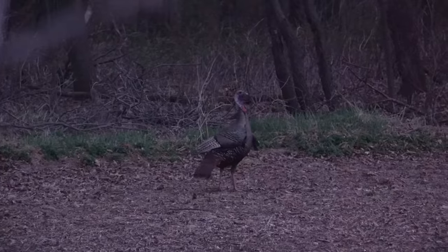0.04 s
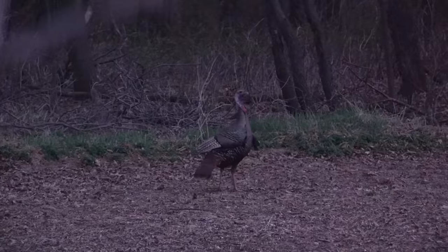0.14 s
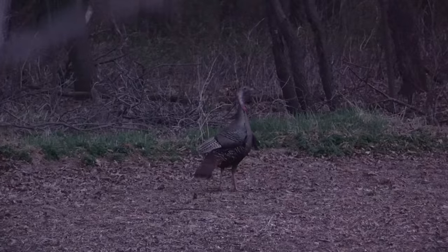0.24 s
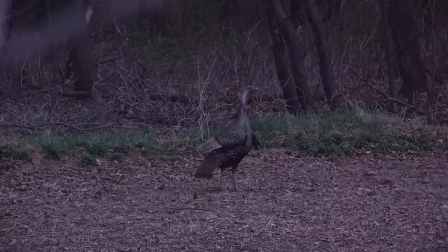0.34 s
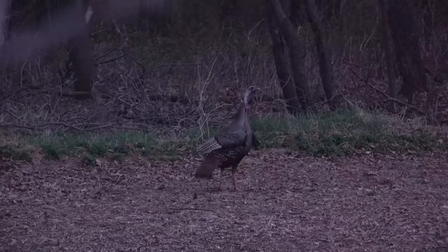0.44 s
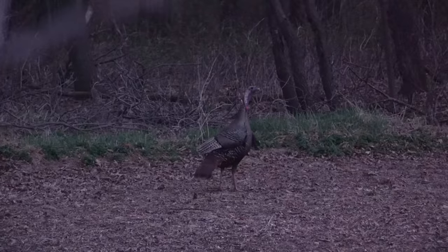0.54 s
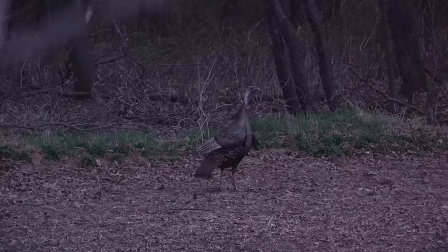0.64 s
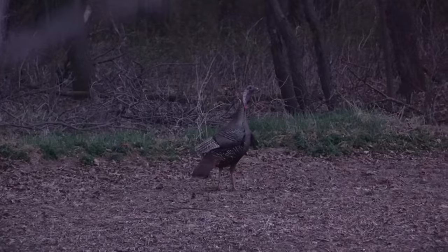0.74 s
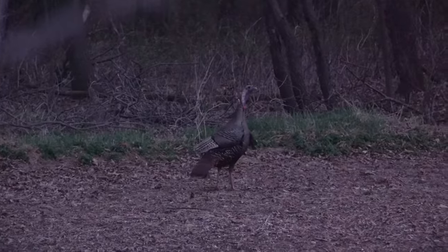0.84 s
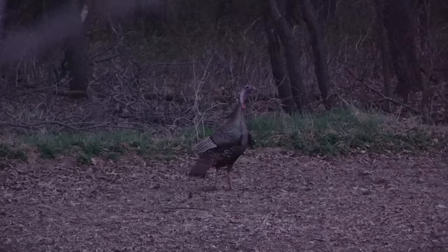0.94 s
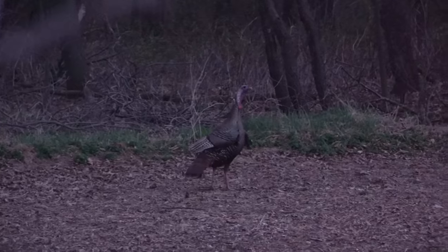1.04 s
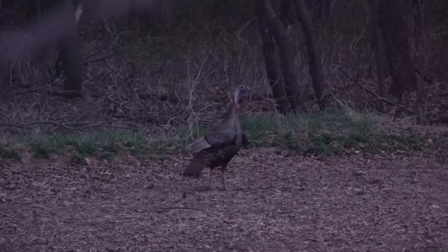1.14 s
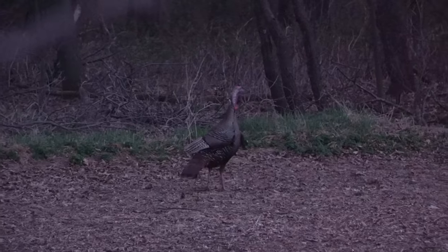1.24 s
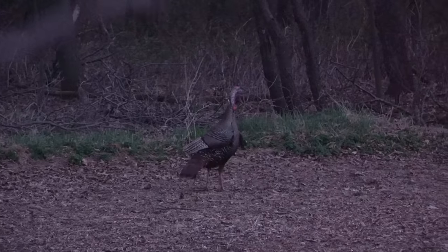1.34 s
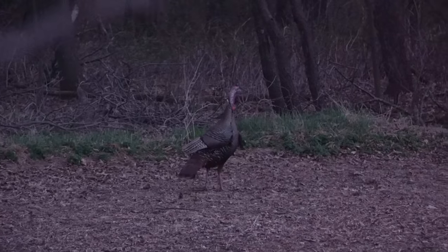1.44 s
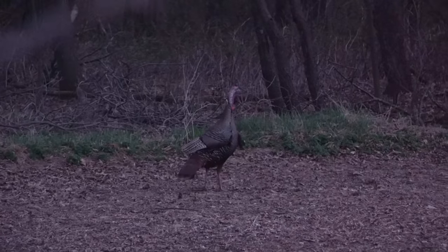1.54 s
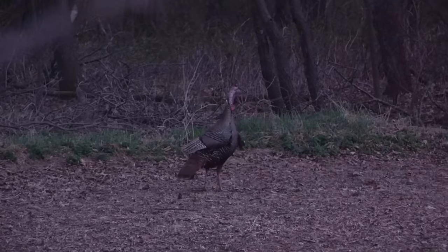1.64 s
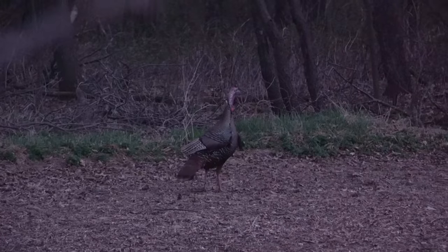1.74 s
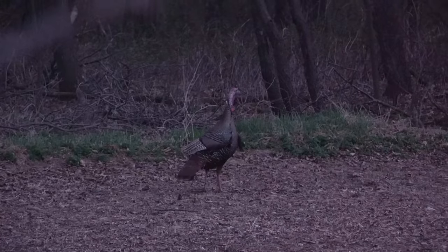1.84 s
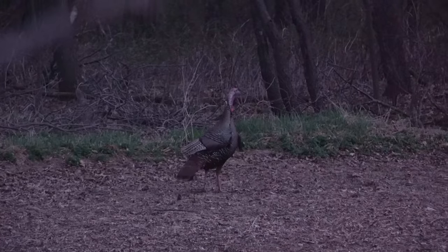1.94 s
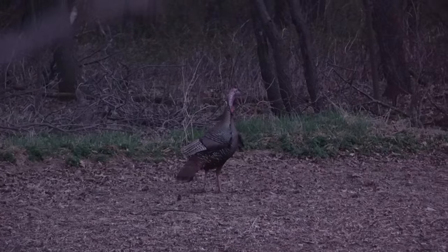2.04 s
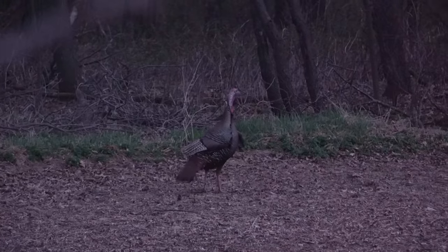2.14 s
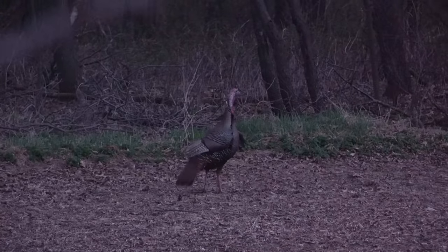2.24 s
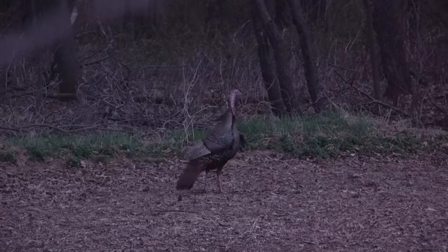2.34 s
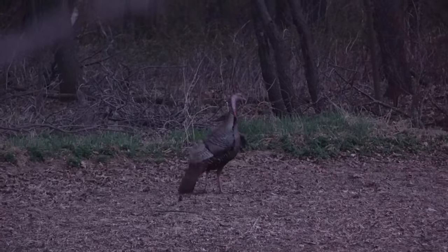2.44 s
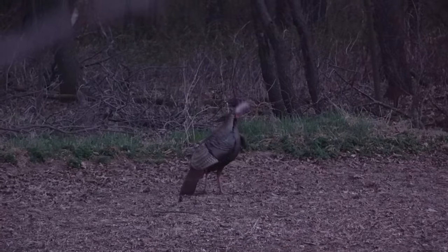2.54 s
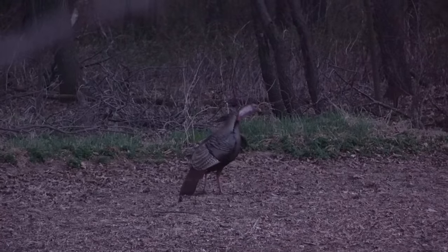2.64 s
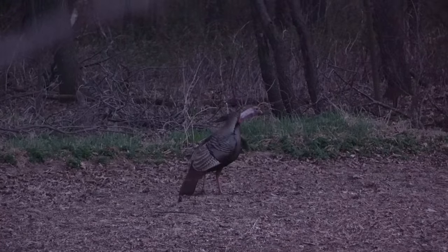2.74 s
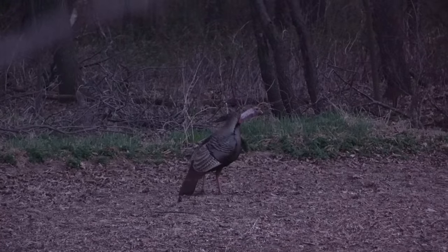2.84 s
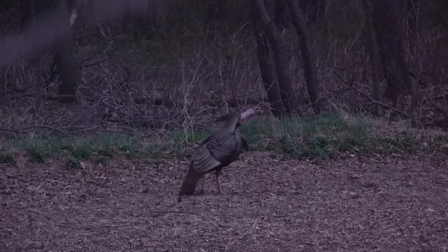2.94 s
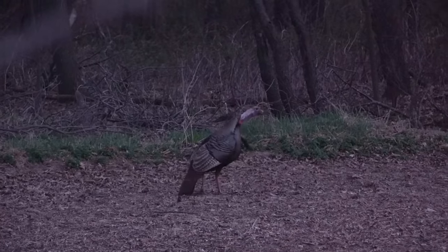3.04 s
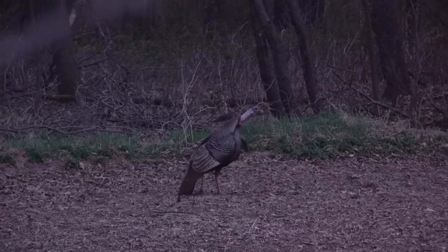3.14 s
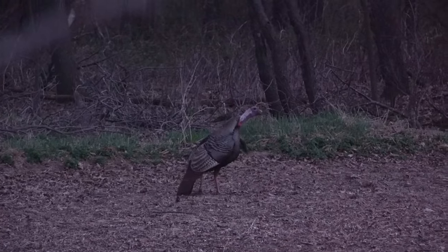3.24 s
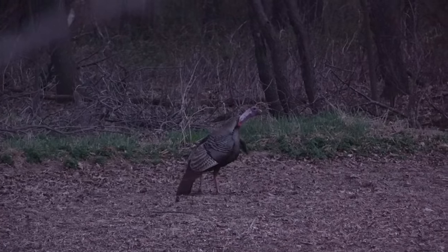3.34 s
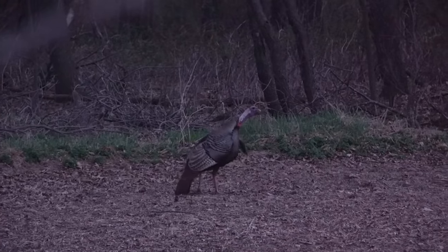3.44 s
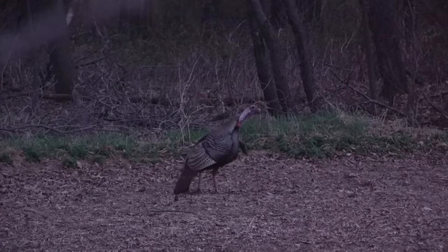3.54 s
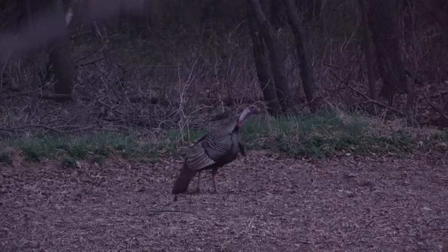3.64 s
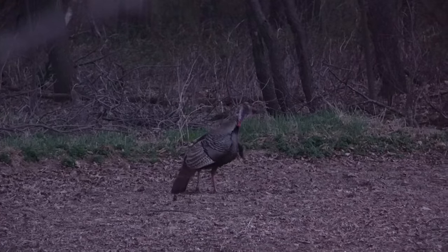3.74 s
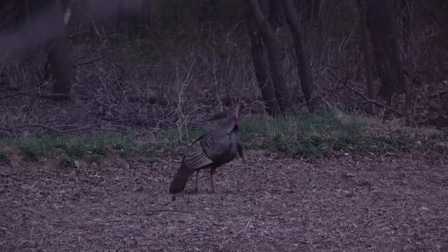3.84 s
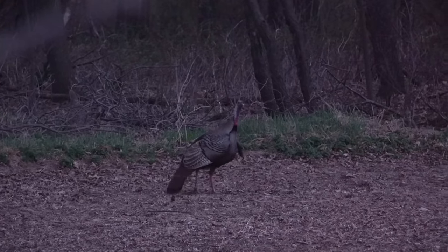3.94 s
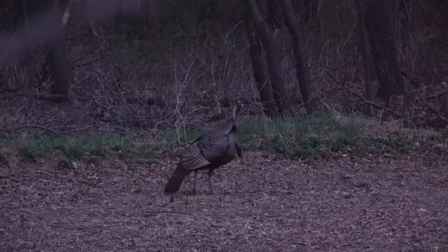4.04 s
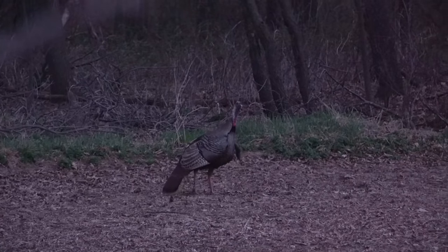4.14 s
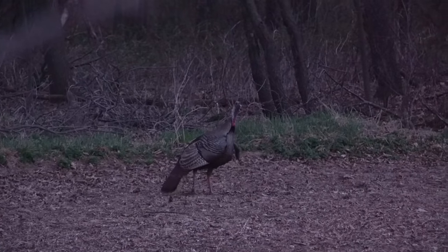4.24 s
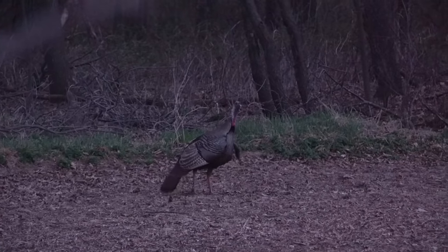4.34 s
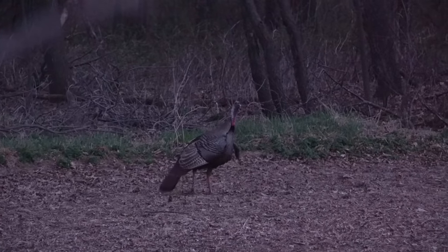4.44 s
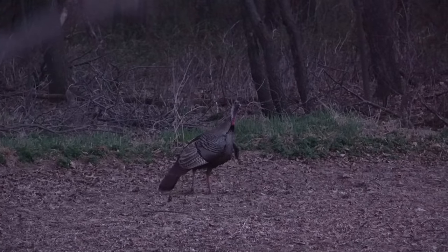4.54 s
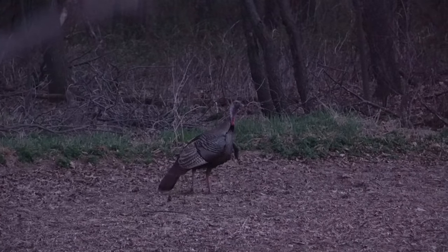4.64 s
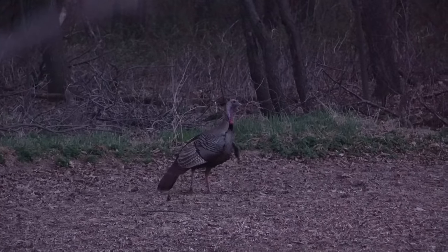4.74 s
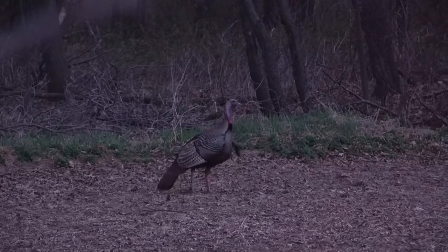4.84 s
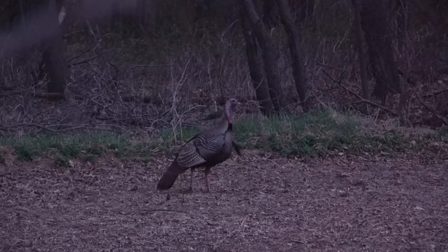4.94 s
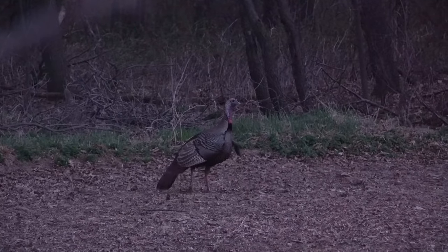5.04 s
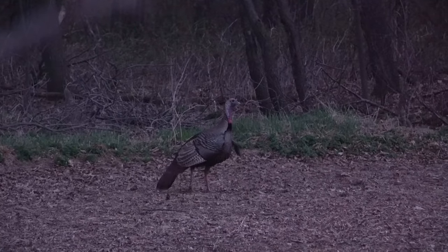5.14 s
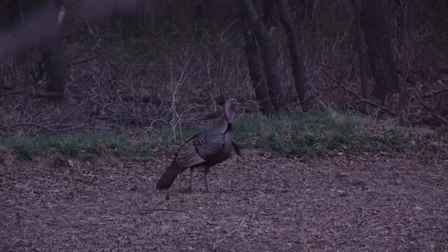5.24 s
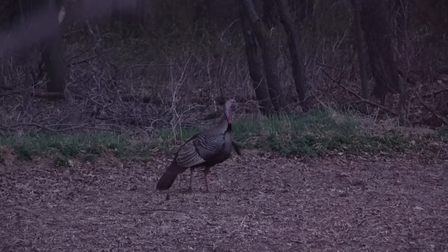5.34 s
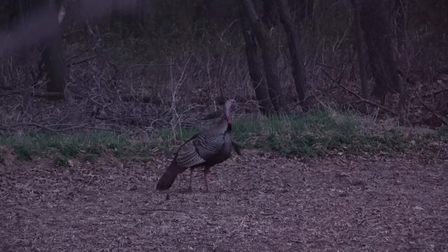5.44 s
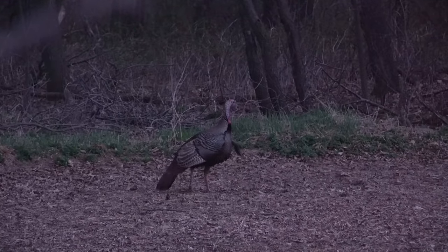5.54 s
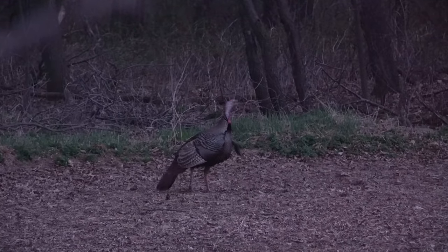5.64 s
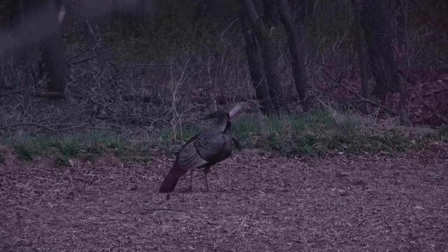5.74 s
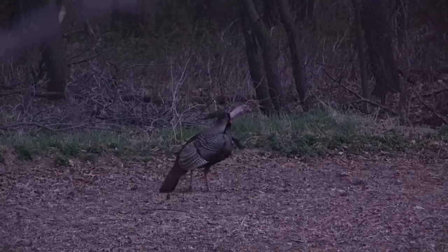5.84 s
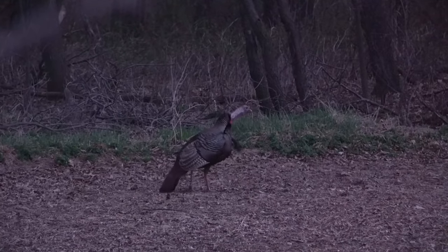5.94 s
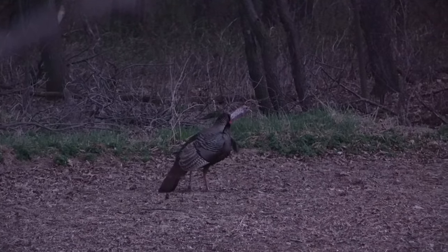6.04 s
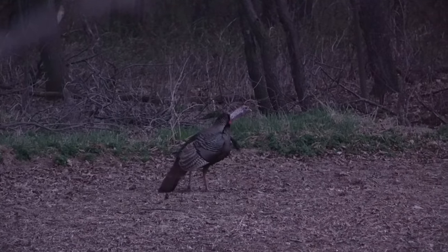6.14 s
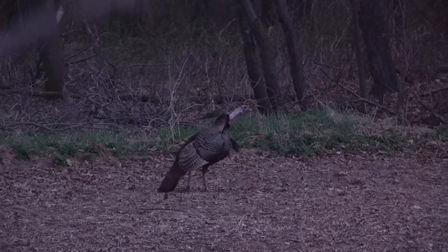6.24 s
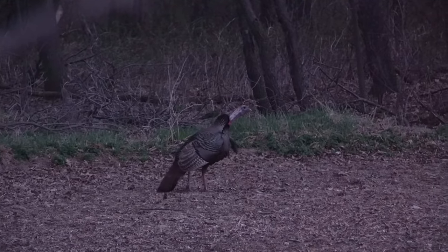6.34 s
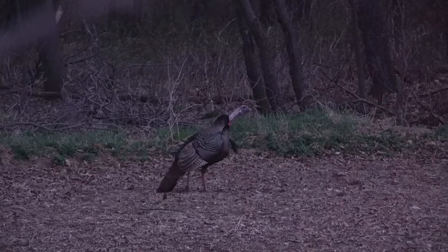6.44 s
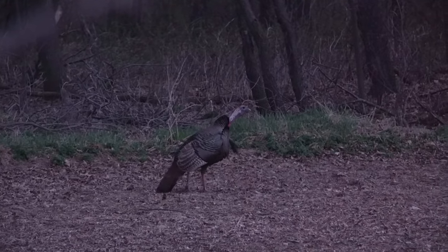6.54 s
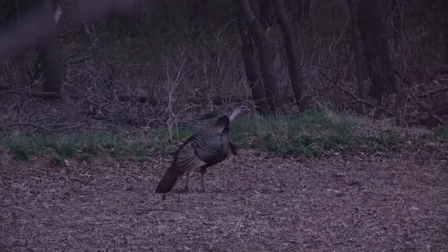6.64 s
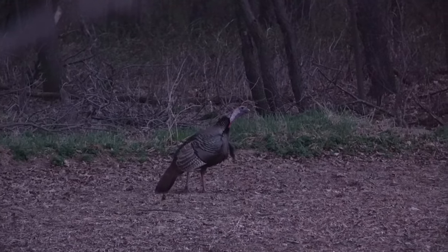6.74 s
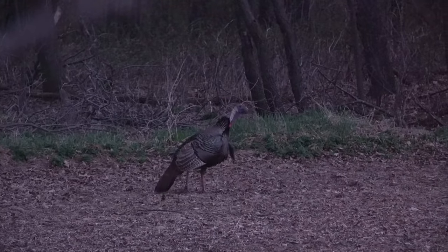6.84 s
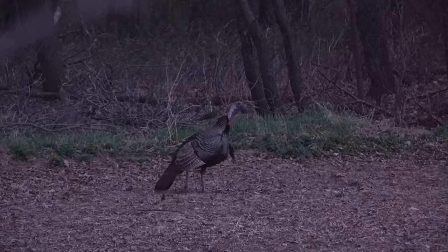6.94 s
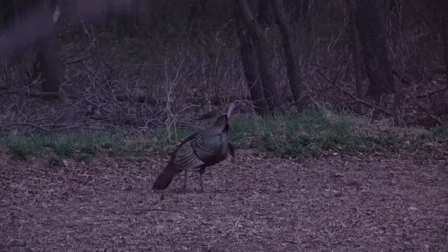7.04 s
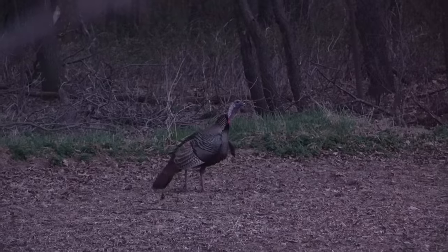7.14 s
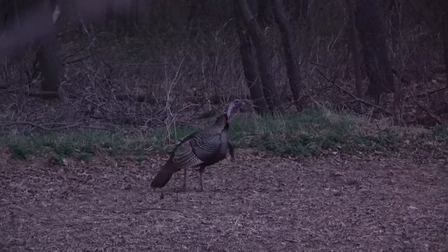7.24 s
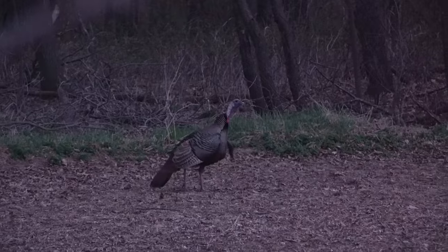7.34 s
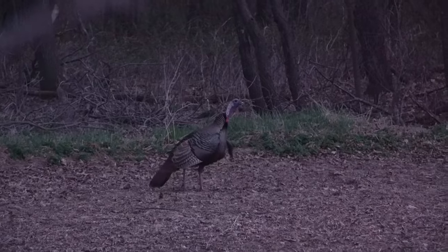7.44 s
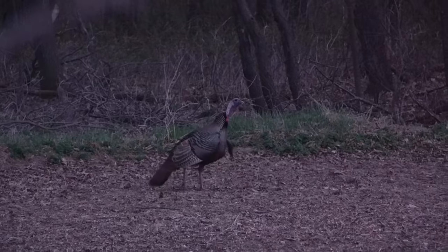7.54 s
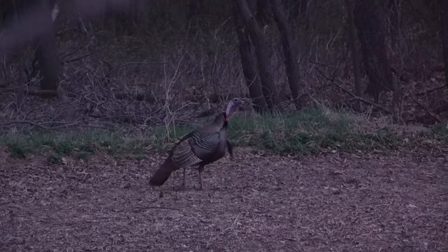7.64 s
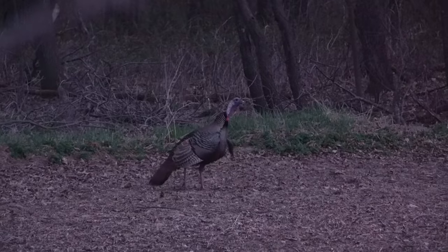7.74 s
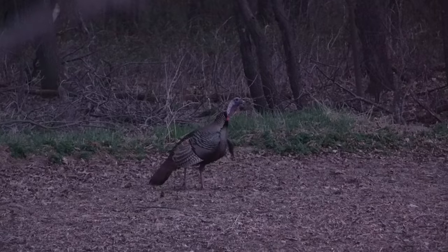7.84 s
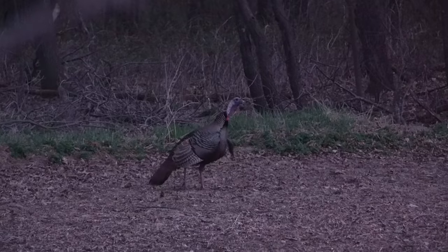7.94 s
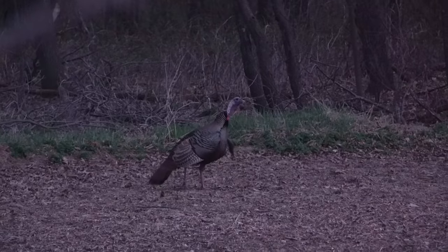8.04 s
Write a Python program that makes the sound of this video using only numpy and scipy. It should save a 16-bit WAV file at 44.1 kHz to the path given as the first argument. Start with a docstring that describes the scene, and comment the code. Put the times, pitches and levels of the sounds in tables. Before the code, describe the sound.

A deep, wavering, wind-like rumble fills an outdoor wood edge from 0 to 8 seconds, with quiet steady hiss and a light breeze that comes and goes. From 0.3 seconds faint songbirds give tiny slurs and whistles around 2 to 3 kilohertz; a distant crow caws hoarsely from 0.8 to 2.2 seconds, with a faint stuttering run of yaps near 1.7 to 2.2. At 2.5 seconds the turkey gobbles: a brief squeaky onset, then rapid hoarse yelps falling from about 580 to 300 hertz, slowing and fading by 4. Trees answer with a diffuse echo. Caws return from 4.1 to 5.4, among chirps and dim hoots. A second, tighter gobble runs from 5.7 to 7, with a thin squeak near 6.9. Rumble, a small breeze swell around 7.3, sparse chirps and faint low hoots finish it. Wide stereo, turkey leaning slightly left.

```python
"""Turkey gobbling at a wood's edge

A wild turkey gobbles twice: rattles of short hoarse yelps that sink in pitch, each a pulsing membrane
ringing mouth, chest and throat resonances. The wood answers with decaying scattered noise. Songbirds
(gliding sines), far hoots and yaps (arched sines) and a crow (hoarse pulses) call farther off,
over a wavering low rumble, steady hiss and a breeze in the trees (coloured noise)."""
import sys
import numpy as np
from scipy import signal
from scipy.fft import rfft, irfft, next_fast_len
from scipy.io import wavfile

SR = 44100
rng = np.random.default_rng(int(sys.argv[2]) if len(sys.argv) > 2 else 0)


def materialize(psi):
    """Save the field psi as 16-bit PCM at rate SR to the path in sys.argv[1].

    A 1-D psi becomes a single channel; in a 2-D psi each row is a channel.
    """
    bounded = np.clip(np.atleast_2d(psi).T, -1, 1)
    quanta = np.round(bounded * 32767).astype(np.int16)
    wavfile.write(sys.argv[1], SR, quanta)


N = 356769
TIME = np.arange(N) / SR

# All table levels are relative, before group gains; call lengths are before each group's stretch.

# Two gobbles: start_s, length_s
GOBBLES = [(2.52, 1.47), (5.7, 1.3)]
# Yelps, full voice near 570 Hz or dropped to about 310 Hz:
# near_middle_s, length_s, pitch_hz, level_db, strain_db (rasp relative to the level)
YELPS = [(2.53, 0.055, 582.6, -24, -10.5), (2.58, 0.022, 434, -23, -19), (2.606, 0.033, 589, -24, -4.5),
         (2.678, .034, 530, -18, -10), (2.737, 0.029, 576.5, -21, -9.5), (2.763, .018, 354, -33, 4.5),
         (2.789, 0.03, 569, -23, -7.5), (2.835, 0.027, 302.4, -22.5, -6.5), (2.856, 0.036, 596, -23, -5.5),
         (2.879, .028, 549, -20, -12), (2.906, 0.037, 600, -20, -13.5), (2.933, .031, 551, -22.5, -9.5),
         (2.984, .037, 583, -24.5, -6), (3.044, 0.038, 574.4, -20.5, -8),
         (3.117, 0.048, 339.6, -19.5, -11.5), (3.177, .046, 561, -20.5, -8),
         (3.241, 0.048, 336.7, -22.5, -7), (3.311, 0.04, 327, -19.5, -9), (3.386, 0.032, 327, -24.5, -6),
         (3.466, .039, 321.8, -23, -7.5), (3.536, .037, 309.6, -23.5, -10), (3.62, .025, 303.2, -24, -16),
         (3.677, 0.037, 294.6, -29.5, -17), (3.731, 0.044, 298, -25.5, -11.5),
         (3.805, 0.044, 299.4, -26, -13.5), (3.876, 0.029, 292, -38, -9.5), (3.987, 0.031, 297.6, -34, -20),
         (5.7, .04, 602.6, -19, -14.5), (5.778, .04, 644.4, -20, -13), (5.818, 0.039, 598, -36, -6),
         (5.853, 0.04, 640, -24.5, -9), (5.916, 0.028, 521.4, -19.5, -10.5),
         (5.964, 0.04, 621.5, -21.5, -9), (5.996, 0.022, 533, -21, -19), (6.017, 0.022, 404.6, -20, -8.5),
         (6.048, .038, 597, -18, -9.5), (6.096, .026, 591.6, -21, -12), (6.12, .035, 591, -17, -15),
         (6.189, .043, 333.2, -23.5, -9), (6.247, 0.058, 559.3, -20.5, -9.5),
         (6.326, 0.056, 331, -24, -8.5), (6.378, 0.043, 552, -21, -9.5), (6.419, 0.024, 319.3, -29.5, -8),
         (6.453, .024, 317, -30.5, -2), (6.495, 0.035, 319.7, -28.5, -11.5),
         (6.541, 0.064, 548, -24.5, -11), (6.584, .025, 311, -29, -1.5), (6.608, .031, 304.7, -21, -14),
         (6.65, .025, 308, -28, -10.5), (6.685, .026, 302.3, -28.5, -25), (6.761, 0.03, 309.2, -29, -3.5),
         (6.834, 0.03, 289.8, -25.5, -14), (6.922, 0.039, 283, -35.5, -15), (6.995, .04, 276, -35.5, -19)]
# Course of every gobble, as the neck stretches and the air runs out:
# share_of_length, mouth_hz, windpipe_tuning_ratio, pitch_arch_share, chest_db, throat_db, roughness_0_to_1
COURSE = [(0, 1200, 1.0, .33, -13, -15, 0.54), (0.121, 1100, 1.06, 0.2143, -11, -5.5, 0.48),
          (.27, 1140, 1.03, 0.1683, -4.5, 1, .45), (0.379, 988.5, 1.023, 0.1565, -7, -4, 0.6),
          (0.622, 930, .99, .12, -5, -3, .5), (.76, 870, 0.976, 0.0804, -8.5, -8.5, .35),
          (1, 855, 0.917, 0.061, -2, -10.5, 0.53)]
# Turkey resonances before tuning: centre_hz, width_hz (one pass), level_db
CHEST_MODES = [(559, 79, 0), (839, 43, -3.5)]
THROAT_MODES = [(1654, 133, 0)]
RASP_MODES = [(2206, 290, 8.5), (3065, 260, 5), (3310, 390, 9), (3726, 265, 3.5), (4860, 760, -11)]
# Clean slurs opening each gobble: start_s, length_s, first_hz, middle_hz, last_hz, level_db
OPENING_SLURS = [(2.512, 0.044, 1208, 1712, 1360, -19), (2.574, 0.024, 1035, 1313, 1510, -24.5),
                 (2.605, .055, 1520, 1344, 1310, -32), (5.69, 0.0417, 1410, 1724, 1280, -26.5),
                 (5.76, 0.011, 860, 1086, 1320, -21.5)]

# Wood echo decay: centre_hz, t60_s
ECHO_T60 = [(500, 0.74), (1000, 1.37), (2000, 0.37), (4000, 0.69), (8000, 0.44)]
# Wood echo strength: centre_hz, level_db
ECHO_DB = [(500, 4), (1000, -4.5), (2000, -6.5), (4000, -13.5), (8000, -3)]
# Wood echo left-right agreement: centre_hz, likeness_0_to_1
ECHO_LIKENESS = [(500, 0.05), (1000, 0.67), (2000, 0.92), (4000, 1)]

# Songbird down-slurs, levelling off on one pitch: start_s, length_s, first_hz, level_db
DOWNSLURS = [(0.315, 0.051, 2850, -48.5), (0.888, 0.053, 2650, -41), (1.483, .056, 2760, -57),
             (1.957, 0.03, 3130, -46), (2.141, .046, 2580, -44), (2.31, 0.097, 2670, -54),
             (3.573, 0.076, 2700, -44), (4.725, 0.043, 2450, -40.5), (5.127, 0.061, 3660, -36.5),
             (5.257, 0.029, 2610, -39), (5.358, 0.085, 2930, -40), (7.218, 0.075, 2940, -49),
             (7.527, 0.053, 2800, -59), (7.769, 0.041, 2800, -51), (7.93, 0.041, 2790, -51)]
# Songbird rising notes: start_s, length_s, middle_hz, level_db
UPSLURS = [(0.454, 0.031, 2340, -37), (0.838, 0.067, 3220, -42), (1.047, 0.064, 2430, -47.5),
           (2.097, 0.025, 2305, -41.5), (3.545, 0.0413, 3160, -36.5), (4.67, 0.052, 2560, -41),
           (5.219, 0.04, 3033, -32.5)]
# Songbird falling chips: start_s, length_s, middle_hz, level_db
CHIPS = [(0.402, 0.038, 3020, -43), (2.042, 0.028, 3050, -45), (2.129, 0.046, 2790, -43),
         (4.645, 0.017, 3050, -33)]
# Songbird held whistles: start_s, length_s, middle_hz, level_db
HELD_WHISTLES = [(.484, 0.055, 2725, -46), (0.958, 0.14, 2307, -51.5), (1.422, 0.11, 3154, -36.5),
                 (1.59, .17, 2504, -45.5), (2.458, 0.047, 3153, -40), (4.051, 0.14, 3169, -33),
                 (4.224, 0.073, 2508, -40), (4.3, 0.1, 2620, -49), (4.571, 0.061, 2297, -37.5),
                 (4.701, 0.12, 3075, -47.5), (4.752, 0.062, 2215, -54)]
# Thin squeak, one curve: time_s, pitch_hz, level_db
SQUEAK = [(6.885, 3400, -58), (6.905, 3510, -34), (6.935, 4780, -71), (6.95, 4230, -43), (6.962, 3040, -31)]
# Far hoots: start_s, length_s, middle_hz, level_db
HOOTS = [(4.65, 0.13, 780, -47), (4.85, 0.3, 505.5, -54), (5.34, 0.208, 788, -49.5),
         (7.197, 0.722, 596, -52.5), (7.7, .45, 772, -55)]
# Far stuttering run of yaps: start_s, length_s, middle_hz, level_db
YAPS = [(1.672, 0.014, 1015, -49), (1.708, 0.017, 1110, -46), (1.742, 0.015, 1170, -46),
        (1.776, 0.022, 1155, -52), (1.81, 0.043, 1150, -61), (1.84, .045, 1127, -45.5),
        (1.895, 0.088, 1134, -48), (2.05, .06, 1098, -56), (2.165, 0.11, 1050, -54)]
# Far crow's caws: middle_s, level_db
CAWS = [(0.771, -51), (1.048, -48), (1.328, -46), (1.629, -42), (1.917, -47), (2.22, -44), (4.11, -39.5),
        (4.418, -38.5), (4.73, -35), (5.04, -39), (5.35, -37)]
# Crow throat resonances: centre_hz, width_hz (one pass), level_db
CROW_THROAT = [(1055, 310, -4.5), (1430, 320, -3.5)]

# Rumble spectrum: frequency_hz, density_db (per Hz)
RUMBLE_SPECTRUM = [(10, 4), (25, -2.5), (40, -6.5), (62, -11), (100, -19.5), (160, -29), (250, -42),
                   (500, -53), (1000, -110)]
# Rumble strength: time_s, level_db
RUMBLE_LEVEL = [(0, -4.5), (.8, -7), (1.5, -10), (2.3, -8.5), (3.15, -14), (3.7, -9), (5.0, -8), (6.2, -10),
                (8.0, -8.5)]
# Hiss spectrum: frequency_hz, density_db (per Hz)
AIR_SPECTRUM = [(200, 6.5), (400, -11), (700, -1), (1500, -0.5), (3400, 1), (4000, -7.5), (4800, -11.5),
                (7000, -12), (15000, -16.5)]
# Breeze spectrum: frequency_hz, density_db (per Hz)
BREEZE_SPECTRUM = [(120, -15), (230, -7.5), (310, -2), (450, -6.5), (700, -10.5), (1200, -21), (2500, -28)]
# Breeze strength: time_s, level_db
BREEZE_LEVEL = [(0, -36.5), (.5, -39.5), (1.1, -41), (1.6, -49), (2.3, -43), (3.0, -41), (3.9, -40),
                (4.4, -38), (4.9, -44), (5.5, -45.5), (6.3, -41.5), (7.0, -47.5), (7.35, -32.5),
                (8.09, -39)]
# Background left-right agreement: frequency_hz, likeness_0_to_1
AIR_LIKENESS = [(50, 1.0), (100, .98), (180, 0.98), (320, 0.62), (600, 0.023), (1200, 0.072), (3000, 1),
                (4500, 0.21), (7000, 0.053)]

# Turkey voice
USUAL_STRAIN_DB = -12
# dB per dB of extra strain: easy yelps are purer, strained ones croak
CHEST_PER_STRAIN, THROAT_PER_STRAIN, ROUGH_PER_STRAIN = 0.68, 0.31, 0.3
MOUTH_WIDTH_HZ = 217  # one pass
MOUTH_LOCK = 0.17  # share of the way to the nearest harmonic
RIVALRY_DB, RIVALRY_HZ = 1.5, 75.6  # random level changes of mouth, chest and throat
YELP_FALL, FALL_SCATTER = 0.032, 0.1004  # share of pitch lost over a yelp; its scatter
NECK_SLIDE, NECK_SCATTER = 0.0917, 0.0253  # share the whole tone sinks over a yelp; scatter of its speed

# Songbird glides, for lengths before stretch
LANDING_HZ, SLUR_LEFT = 2262, 0.23  # share of a down-slur's fall left halfway through
RISE_OCTAVES_PER_S = 3.18
CHIP_FALL_OCTAVES, CHIP_S = 0.233, 0.0253  # fall of a chip of this length; longer ones are flatter
REST_HZ, RELAX_PER_S = 2845, 2.7  # held whistles drift towards the middle of the range


def turkey(stretch, voice_db):
    """Two runs of yelps, each following the same course."""
    out = np.zeros(N)
    for middle_s, length_s, pitch_hz, level_db, strain_db in YELPS:
        start_s, duration_s = min(GOBBLES, key=lambda g: abs(g[0] + g[1] / 2 - middle_s))
        share = (middle_s - start_s) / duration_s
        span_s = length_s * stretch
        sound = slide(yelp(share, span_s, pitch_hz, strain_db, rasp_db=2.5))
        add(out, middle_s - .48 * span_s, from_db(level_db + voice_db) * sound)
    return out


def yelp(share, length_s, pitch_hz, strain_db, rasp_db):
    """One yelp, some way into a gobble: pitch arches with the air pressure and rings the windpipe."""
    shares, *columns = np.transpose(COURSE)
    mouth_hz, tuning, arch, chest_db, throat_db, rough = [np.interp(share, shares, c) for c in columns]
    extra_db = strain_db - USUAL_STRAIN_DB
    harmonic_hz = np.round(mouth_hz / pitch_hz) * pitch_hz
    mouth_hz = mouth_hz + MOUTH_LOCK * (harmonic_hz - mouth_hz)
    rough = np.clip(rough * from_db(ROUGH_PER_STRAIN * extra_db), .15, 1)

    u = np.linspace(0, 1, int(length_s * SR))
    fall = YELP_FALL + FALL_SCATTER * rng.uniform(-0.96, 1)
    contour_hz = pitch_hz * (1 - arch * (2 * u - 1) ** 2 - fall * (u - .5))
    source = syrinx(contour_hz, rough, jitter=.095, flutter_hz=597, hiss=2.2)
    pressure = swell(u, edge=0.33)

    rings = [(0, resonate(source, [(mouth_hz, MOUTH_WIDTH_HZ, 0)])),
             (chest_db + CHEST_PER_STRAIN * extra_db, resonate(source, CHEST_MODES, tuning)),
             (throat_db + THROAT_PER_STRAIN * extra_db, resonate(source, THROAT_MODES, tuning))]
    voice = rms_one(sum(from_db(db + RIVALRY_DB * wander(len(u), RIVALRY_HZ)) * ring for db, ring in rings))
    rasp = from_db(strain_db + rasp_db) * resonate(source, RASP_MODES, tuning)
    return (voice + rasp * pressure) * pressure  # rasp gathers at full pressure


def slide(sound):
    """The neck jerks forward during a yelp, so its whole tone sinks: a slowing time warp."""
    u = np.linspace(-.5, .5, len(sound))
    speed = 1 + NECK_SCATTER * rng.uniform(-0.99, 1) - NECK_SLIDE * u
    return np.interp(np.cumsum(speed), np.arange(len(sound)), sound, right=0)


def syrinx(pitch_hz, rough, jitter, flutter_hz, hiss):
    """Pulses of a flapping membrane: uneven in time and strength, with a puff of air in each."""
    size = len(pitch_hz)
    uneven_hz = pitch_hz * (1 + jitter * rough * wander(size, flutter_hz))
    phase = 2 * np.pi * np.cumsum(uneven_hz) / SR
    pulses = rms_one(sum(np.cos(k * phase) for k in range(1, int(6000 / pitch_hz.max()))))
    puffs = np.resize(rng.standard_normal(8192), size) * (1 + np.cos(phase))
    return pulses * (1 + 0.2 * rough * wander(size, flutter_hz)) + hiss * rough * puffs


def resonate(x, modes, tuning=1):
    """Parallel resonances, each passed twice for dark valleys; rms 1."""
    out = 0
    for hz, width_hz, db in modes:
        r = np.exp(-np.pi * width_hz / SR)
        turn = 2 * np.pi * hz * tuning / SR
        section = [(1 - r * r) / 2, 0, (r * r - 1) / 2, 1, -2 * r * np.cos(turn), r * r]
        out = out + from_db(db) * signal.sosfilt([section, section], x)
    return rms_one(out)


def whistles(notes, stretch, waver):
    """Nearly pure notes gliding through three pitches."""
    out = np.zeros(N)
    for start_s, length_s, first_hz, middle_hz, last_hz, level_db in notes:
        u = np.linspace(0, 1, int(length_s * stretch * SR))
        glide_hz = np.polyval(np.polyfit([0, .5, 1], [first_hz, middle_hz, last_hz], 2), u)
        hz = glide_hz * (1 + waver * wander(len(u), 302))
        tone = np.sqrt(2) * np.sin(2 * np.pi * np.cumsum(hz) / SR)
        add(out, start_s, from_db(level_db) * tone * swell(u, edge=0.19))
    return out


def wood_echo(build_s):
    """Scatter from many trunks: noise that builds up, then dies at its own rate in each band."""
    size = int(1.5 * SR)
    t = TIME[:size]
    scatter = stereo_noise([(100, 0), (10000, 0)], ECHO_LIKENESS, size)
    edges_hz = 350 * 2 ** (np.arange(8) * 2 / 3)
    out = 0
    for low_hz, high_hz in zip(edges_hz, edges_hz[1:]):
        hz = np.sqrt(low_hz * high_hz)
        decay = from_db(-60 * t / at_hz(ECHO_T60, hz)) * (1 - np.exp(-t / build_s))
        decay = decay / np.sqrt(np.sum(decay ** 2))
        bandpass = signal.butter(2, [low_hz, high_hz], "band", fs=SR, output="sos")
        band = signal.sosfilt(bandpass, scatter)
        out = from_db(at_hz(ECHO_DB, hz)) * band * decay - out  # alternate signs join the bands
    return out


def in_wood(x, echo):
    """The echo of a sound, in stereo, by convolution."""
    return signal.fftconvolve(x[None], echo, axes=1)[:, :N]


def lean(x, low_hz, high_hz, share):
    """Tilt one band to a side: positive share favours the left, negative the right."""
    hz = np.maximum(np.arange(N // 2 + 1) * SR / N, 1)
    weight = 1 / (1 + (low_hz / hz) ** 8) / (1 + (hz / high_hz) ** 8)
    band = irfft(rfft(x.mean(axis=0)) * weight, N)
    return x + share * band * [[1], [-1]]


def songbirds():
    """Four kinds of note, each with its own way of gliding."""
    def glide(start_s, length_s, hz, db, octaves):
        return start_s, length_s, hz * 2 ** (-octaves / 2), hz, hz * 2 ** (octaves / 2), db

    notes = []
    for s, length_s, hz, db in DOWNSLURS:
        halfway_hz = LANDING_HZ + SLUR_LEFT * (hz - LANDING_HZ)
        notes.append((s, length_s, hz, halfway_hz, LANDING_HZ, db))
    for s, length_s, hz, db in UPSLURS:
        notes.append(glide(s, length_s, hz, db, RISE_OCTAVES_PER_S * length_s))
    for s, length_s, hz, db in CHIPS:
        notes.append(glide(s, length_s, hz, db, -CHIP_FALL_OCTAVES * (CHIP_S / length_s) ** 2))
    for s, length_s, hz, db in HELD_WHISTLES:
        notes.append(glide(s, length_s, hz, db, RELAX_PER_S * length_s * np.log2(REST_HZ / hz)))
    return whistles(notes, stretch=1.1, waver=0.0066)


def call(curve):
    """One pure call that follows a curve of pitch and level."""
    s, hz, db = np.transpose(curve)
    tone = np.sqrt(2) * np.sin(2 * np.pi * np.cumsum(np.interp(TIME, s, hz)) / SR)
    envelope = swell((TIME - s[0]) / (s[-1] - s[0]), edge=0.043)
    return tone * from_db(np.interp(TIME, s, db)) * envelope


def arched(notes, sag):
    """Nearly pure notes whose ends lie a little under their middle."""
    arcs = [(s, length_s, hz * (1 - sag), hz, hz * (1 - sag), db) for s, length_s, hz, db in notes]
    return whistles(arcs, stretch=1.096, waver=0.016)


def crow(length_s, pitch_hz):
    """Hoarse caws: rough membrane pulses, arched in pitch, through two throat resonances."""
    out, u = np.zeros(N), np.linspace(0, 1, int(length_s * SR))
    contour_hz = pitch_hz * (1 - 0.1647 * (2 * u - 1) ** 2)
    for middle_s, level_db in CAWS:
        source = syrinx(contour_hz, 0.71, jitter=0.0834, flutter_hz=400, hiss=3.0)
        caw = resonate(source, CROW_THROAT) * swell(u, edge=0.47)
        add(out, middle_s - length_s / 2, from_db(level_db) * caw)
    return out


def chorus(db, pitch_hz, count):
    """Many faint songbirds, slurring up and down at random."""
    notes = []
    for when, length, high, slope, bend, loud in rng.random((count, 6)):
        hz = pitch_hz * 1.45 ** (high - .5)
        glide, bow = 1.25 ** (slope - .5), 1.25 ** (bend - .5)
        length_s = 0.0457 + 0.087 * length
        notes.append((when * N / SR, length_s, hz * glide, hz * bow, hz / glide, db - 8 * loud))
    return whistles(notes, stretch=0.85, waver=0.0069)


def background(air_db, rumble_top):
    """Deep rumble with rounded crests, even hiss, and a breeze that comes and goes."""
    size = next_fast_len(N)
    rumble = stereo_noise(RUMBLE_SPECTRUM, AIR_LIKENESS, size)[:, :N]
    rumble = rumble * from_db(np.interp(TIME, *np.transpose(RUMBLE_LEVEL)))
    air = from_db(air_db) * stereo_noise(AIR_SPECTRUM, AIR_LIKENESS, size)[:, :N]
    breeze = stereo_noise(BREEZE_SPECTRUM + [(6000, -90)], AIR_LIKENESS, size)[:, :N]
    breeze = breeze * from_db(np.interp(TIME, *np.transpose(BREEZE_LEVEL)))
    breeze = lean(breeze, 220, 390, share=0.56)
    breeze = lean(breeze, 480, 1500, share=-0.39)
    return rumble_top * np.tanh(rumble / rumble_top) + air + breeze


def stereo_noise(spectrum, likeness, size):
    """Noise of a given colour whose two sides agree by frequency; rms 1."""
    hz = np.maximum(np.arange(size // 2 + 1) * SR / size, 1)
    mid, side = rfft(rng.standard_normal((2, size)))
    alike = np.clip(at_hz(likeness, hz), 0, .9995)
    both = np.sqrt(1 + alike) * mid + np.sqrt(1 - alike) * side * [[1], [-1]]
    return rms_one(irfft(both * from_db(at_hz(spectrum, hz)), size))


def from_db(db):
    """Decibels to gain."""
    return 10 ** (np.asarray(db) / 20)


def rms_one(x):
    """Scale to unit rms."""
    return x / np.sqrt(np.mean(x ** 2) + 1e-20)


def at_hz(points, hz):
    """Read a table on a log-frequency axis."""
    table_hz, values = np.transpose(points)
    return np.interp(np.log(hz), np.log(table_hz), values)


def add(out, start_s, sound):
    """Mix a sound in at a time."""
    i = int(start_s * SR)
    out[i:i + len(sound)] += sound[:max(N - i, 0)]


def wander(size, rate_hz):
    """Random values joined by straight lines, spread near 1."""
    at = np.arange(size) * rate_hz / SR
    return np.interp(at, np.arange(4096), rng.standard_normal(4096))


def swell(u, edge):
    """Envelope over u = 0..1 with rounded edges."""
    return np.sin(np.pi / 2 * np.clip(np.minimum(u, 1 - u) / edge, 0, 1)) ** 2


def scene():
    """Turkey near, its low-mid band leaning left; other birds deeper in the wood; air behind."""
    echo = wood_echo(build_s=0.00039)
    gobbles = turkey(stretch=1.3, voice_db=-0.17) + whistles(OPENING_SLURS, stretch=1.097, waver=.022)
    gobbles = signal.sosfilt(signal.butter(6, 5800, fs=SR, output="sos"), gobbles)  # little treble
    near = lean(gobbles + from_db(0.5) * in_wood(gobbles, echo), 300, 850, share=.48)

    songs = from_db(3.5) * songbirds() + call(SQUEAK)
    low_calls = from_db(6.0) * (arched(HOOTS, sag=0.0383) + arched(YAPS, sag=0.044))
    low_calls = low_calls + crow(length_s=.135, pitch_hz=337.7)
    farthest = chorus(db=-46.5, pitch_hz=2740, count=60)  # heard mostly by its echo
    direct = songs + low_calls + .22 * farthest
    birds = direct + from_db(1.5) * in_wood(songs + 0.67 * low_calls + farthest, echo)
    return near + birds + background(air_db=-45.0, rumble_top=.72)


def record(dry):
    """Cut the lowest sway (gently, 8 Hz) and the top (steeply, 15.8 kHz)."""
    dry = signal.sosfilt(signal.butter(1, 8, "high", fs=SR, output="sos"), dry)
    return signal.sosfilt(signal.ellip(10, .1, 80, 15800, fs=SR, output="sos"), dry)


dry = scene()
out = record(dry)
materialize(out)
```